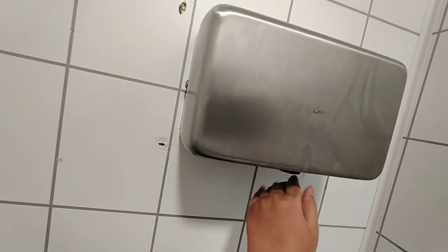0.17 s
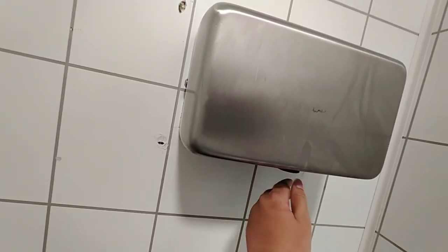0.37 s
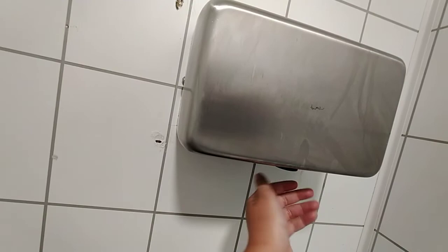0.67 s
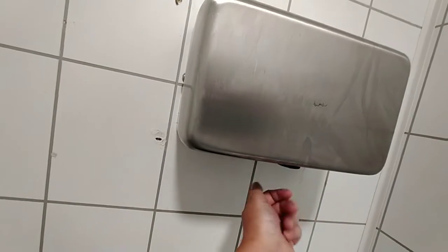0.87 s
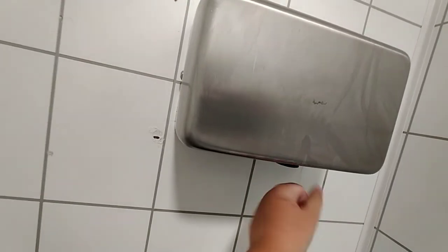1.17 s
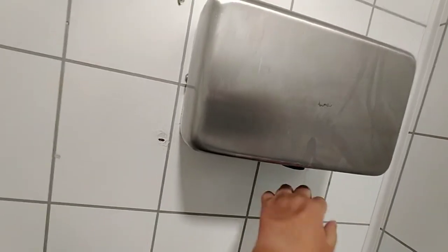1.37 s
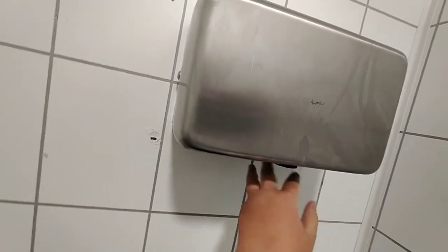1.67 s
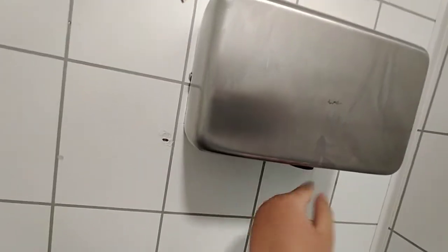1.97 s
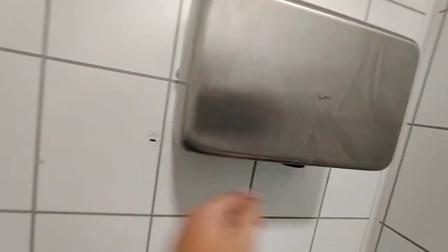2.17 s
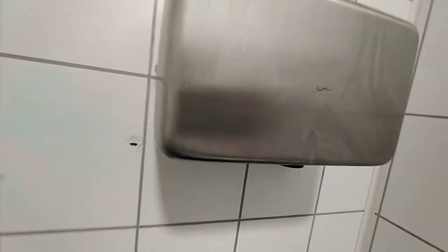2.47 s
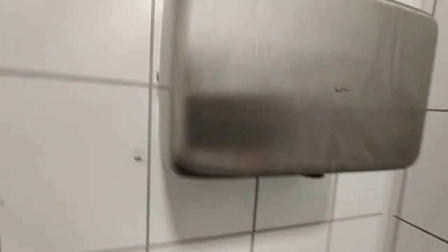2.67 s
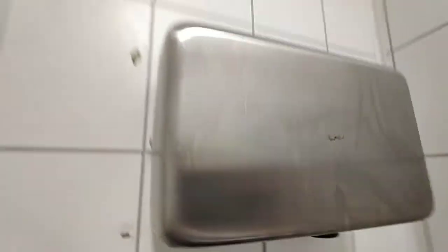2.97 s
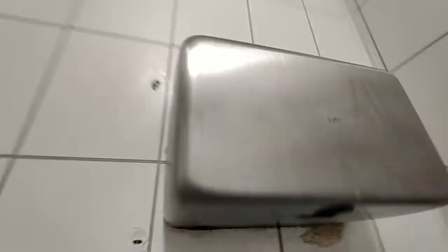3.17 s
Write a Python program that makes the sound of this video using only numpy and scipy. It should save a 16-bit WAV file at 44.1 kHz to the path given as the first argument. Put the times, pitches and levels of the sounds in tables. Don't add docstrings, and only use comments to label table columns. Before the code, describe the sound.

An electric hand dryer roars close to the microphone in a tiled restroom, a narrow, breathy howl with little bass. From 0 to 2.2 seconds a moving hand bends its pitch and adds hiss and rough flutter, busiest around 0.7 to 1.3. At about 2.25 power drops: the blast fades, low hum opens up, and a metallic, resonant motor whine glides down, swelling unevenly until the cut near 3.3.

```python
import sys
import numpy as np
from scipy import signal
from scipy.fft import rfft, irfft
from scipy.io import wavfile
from scipy.ndimage import uniform_filter1d

SR = 44100
rng = np.random.default_rng(int(sys.argv[2]) if len(sys.argv) > 2 else 0)


def voltage_ratio(level):
    return 10 ** (np.asarray(level, float) / 20)


def dump_mix(stems):
    frames = np.atleast_2d(stems).T
    limited = np.clip(frames, -1, 1)
    pcm = np.round(limited * 32767).astype(np.int16)
    wavfile.write(sys.argv[1], SR, pcm)


N = 146412
HZ = np.fft.rfftfreq(1024, 1 / SR)[:, None]
FRAME_S = np.arange(N // 256 + 5) * 256 / SR
TREBLE = np.clip((HZ - 2600) / 900, 0, 1)

# (time [s], howl level [dB], howl pitch [Hz], spray off the skin [dB], rumble of the turned stream [dB])
HAND = [(0, -8.5, 2470, -27.5, -31.5), (.57, -10, 2444, -29, -32), (.72, -10.5, 2550, -26.5, -28),
        (.86, -15.5, 2480, -26.5, -25.5), (.95, -12.5, 2700, -28, -33.5), (1.05, -12.5, 2760, -26.5, -26.5),
        (1.065, -9, 2580, -34, -35.5), (1.145, -11, 2520, -35.5, -30.5), (1.16, -6.5, 2590, -27.5, -31.5),
        (1.28, -10.5, 2560, -31, -29), (1.56, -16.5, 2350, -27.5, -25.5), (1.72, -9.5, 2360, -32.5, -30),
        (1.88, -9.5, 2560, -23.5, -31), (2.09, -8, 2405, -30.5, -34.5), (2.13, -8.5, 2570, -25.5, -24.5),
        (2.225, -12.5, 2240, -32.5, -31.5), (2.27, -12, 2570, -23.5, -27.5),
        (2.4, -14.5, 2490, -25.5, -26.5)]
# (frequency [Hz], width [Hz], level [dB])
NOZZLE = [(2570, 180, 0)]
# (frequency [Hz], level [dB])
HOWL_SKIRT = [(900, -37.5), (1600, -12), (2500, -7.5), (3100, -2.5), (3700, -11.5), (4500, -18)]
# (frequency [Hz], level [dB])
SCATTER = [(1100, -21), (1750, -5), (2000, -0.5), (2250, -2.5), (2600, 1.5), (3100, -6.5), (3600, -16),
           (4400, -34)]
# (frequency [Hz], density [dB per Hz])
SPRAY = [(3300, -7), (4350, -13.5), (4960, -11), (6080, -11), (7460, -9), (8510, -22), (10000, -18),
         (15700, -14.5)]
# (frequency [Hz], width [Hz], lift [dB])
DUCT = [(4970, 275, 9), (7740, 230, 2.5), (9630, 1600, 3.5), (13600, 770, 2.5)]
# (frequency [Hz], density [dB per Hz])
RUMBLE = [(45, -65), (150, -41), (400, -32), (620, -25.5), (720, -18), (1300, -13.5), (2200, -7.5),
          (2800, -14)]
COAST_DB = {"howl": 11.5, "shoulder": 10.5, "spray": 8, "rumble": 9.5, "hum": 0}
# (time [s], speed [turns per s])
ROTOR = [(2.25, 450.5), (2.33, 423), (2.47, 381), (2.6, 346), (2.7, 318), (2.87, 289), (2.99, 258),
         (3.1, 236), (3.32, 202)]
MULTIPLES = [1, 2, 3, 4, 4.35, 7, 12, 24]
# (level [dB], fading [dB], tilt as the rotor halves [dB])
ORDERS = [
    (-33.5, .8, 1),
    (-41, 2.5, 4),
    (-44, 2.5, 5),
    (-41.5, 2, 3),
    (-61, 1.5, 24),
    (-46, 1.5, 10),
    (-41, 1, 7),
    (-60, 3, 0),
]
# (frequency [Hz], width [Hz], level [dB])
TONE_PATH = [(455, 45, -4), (522, 35, 4), (580, 50, 1), (715, 70, 3), (860, 70, 3), (925, 60, 2),
             (1040, 60, 5), (1480, 150, 4), (2750, 900, 4)]
# (frequency [Hz], width [Hz], level [dB])
CASING = [(710, 40, -11), (1440, 24, 2), (1770, 36, -1), (865, 40, -12), (1040, 40, -12), (2120, 30, -10)]
# (time [s], level [dB], length [s])
PUFFS = [
    (1.215, -33, .03),
    (2.09, -41, .02),
]
# (frequency [Hz], width [Hz], level [dB])
ROOM_MODES = [(87, 10, 11), (135, 20, 3), (170, 18, -1), (205, 30, 5), (237, 28, 8), (261, 14, 8),
              (285, 32, 11), (318, 28, 10), (353, 22, 4), (379, 14, 4), (403, 14, 1), (438, 36, 1.5),
              (490, 25, -9)]
# (frequency [Hz], density [dB per Hz])
HUM = [(20, -6), (60, -6), (90, 4), (180, 0.5), (300, -16), (500, -8), (900, -20)]

RUN_HZ, WOBBLE_HZ = 449.8, 0.63
SCATTER_DB, SCATTER_SHARE = -21, .95
CASING_DB, CASING_PEAK_OCT, CASING_FALL_DB = -22.5, .38, 20
HUM_DB = -35
OPEN_S, OPEN_RAMP_S = 2.245, .012
BASS_CUT_DB, TONE_CUT_DB, CASING_CUT_DB = -28, -7, -14
ROOM_T60_S, ROOM_DB = 0.34, -6.5
EDGE_HZ = 15740


def evened(x):
    return x / np.sqrt(np.mean(np.abs(x) ** 2) + 1e-20)


def read(points, hz):
    f, value = np.transpose(points)
    return np.interp(np.log(hz + 1), np.log(f + 1), value)


def modal(modes, hz):
    return sum(voltage_ratio(db) / (1 + 2j * (hz - f) / w) for f, w, db in modes)


def standing(modes, hz):
    return sum((-1) ** k * voltage_ratio(db) / (1 + (2 * (hz - f) / w) ** 2) for k, (f, w, db) in enumerate(modes))


def drift(t, top_hz):
    rates = np.geomspace(1, top_hz, 30)
    return evened(sum(np.sin(2 * np.pi * (f * t + rng.random())) / f ** 0.083 for f in rates))


def speed(t):
    s, hz = np.transpose(ROTOR)
    coasting = np.minimum(np.interp(t, s, hz), RUN_HZ)
    return np.where(t > s[0], coasting, RUN_HZ)


def slowed(t):
    return np.log2(RUN_HZ / speed(t))


def shut(t):
    return 1 - np.clip((t - OPEN_S) / OPEN_RAMP_S, 0, 1)


def hand(column):
    table = np.transpose(HAND)
    return np.interp(FRAME_S, table[0], table[column])


def air(shape, level_db, patchy_db, flicker_db):
    a, b, patches = rng.standard_normal((len(FRAME_S), 513, 3)).T
    patches = uniform_filter1d(patches, size=12, axis=0)
    patches = evened(uniform_filter1d(patches, size=10, axis=1))
    shape = shape / np.sqrt(np.sum(shape ** 2, axis=0))
    gain = voltage_ratio(level_db + patchy_db * patches + flicker_db * drift(FRAME_S, top_hz=30.35))
    spectra = (a + 1j * b) * shape * gain
    return signal.istft(spectra, nperseg=1024, noverlap=768)[1][:N] * np.sqrt(1.5)


def ring(modes, colour, level_db, flicker_db):
    t, hz = np.arange(N) / SR, np.fft.rfftfreq(N, 1 / SR)
    rung = irfft(rfft(rng.standard_normal(N)) * modal(modes, hz) * voltage_ratio(read(colour, hz)), N)
    return evened(rung) * voltage_ratio(np.interp(t, FRAME_S, level_db) + flicker_db * drift(t, top_hz=20))


def howl():
    moved = HZ * NOZZLE[0][0] / hand(2)
    shape = abs(modal(NOZZLE, moved)) * voltage_ratio(read(HOWL_SKIRT, moved))
    level_db = hand(1) - 4.0 - COAST_DB["howl"] * slowed(FRAME_S)
    return air(shape, level_db, 0.57, 0.7)


def scattered_howl():
    nudged = HZ * (NOZZLE[0][0] / hand(2)) ** 0.25
    turned_db = SCATTER_SHARE * (hand(4) - np.mean(np.transpose(HAND)[4]))
    level_db = SCATTER_DB + turned_db - COAST_DB["shoulder"] * slowed(FRAME_S)
    return air(voltage_ratio(read(SCATTER, nudged)), level_db, 2.8, 1.0)


def spray():
    lift_db = sum(db * np.exp(-((HZ - f) / w) ** 2) for f, w, db in DUCT)
    level_db = hand(3) - COAST_DB["spray"] * slowed(FRAME_S)
    return air(TREBLE * voltage_ratio(read(SPRAY, HZ) + lift_db), level_db, 1.0, 1.2)


def rumble():
    shape = (HZ > 0) * voltage_ratio(read(RUMBLE, HZ) - 30 * TREBLE)
    level_db = hand(4) + 8.5 - COAST_DB["rumble"] * slowed(FRAME_S)
    return air(shape, level_db, 1.72, 0.54)


def rotor():
    t = np.arange(N) / SR
    hz = uniform_filter1d(speed(t), size=1500) + WOBBLE_HZ * drift(t, top_hz=12)
    turn = 2 * np.pi * np.cumsum(hz) / SR
    tones = []
    for k, (db, fading_db, tilt_db) in zip(MULTIPLES, ORDERS):
        fade_db = fading_db * drift(t, top_hz=14)
        level = voltage_ratio(db + fade_db + tilt_db * slowed(t) + TONE_CUT_DB * shut(t))
        if tones:
            path = standing(TONE_PATH, k * hz) / (1 + (k * hz / 3300) ** 12)
        else:
            path = standing(ROOM_MODES, hz)
        tones.append(np.sqrt(2) * level * (path * np.exp(1j * k * turn)).real)
    return sum(tones)


def casing():
    off_peak = slowed(FRAME_S) - CASING_PEAK_OCT
    level_db = CASING_DB - CASING_FALL_DB * off_peak ** 2 + CASING_CUT_DB * shut(FRAME_S)
    return ring(CASING, [(400, 1), (700, -0.5), (2200, -2.5), (3000, -33)], level_db, 0.66)


def puffs():
    t = np.arange(N) / SR
    return sum(voltage_ratio(db) * np.exp(-((t - s) / length) ** 2) * np.sin(4 * (t - s) / length)
               for s, db, length in PUFFS)


def room_hum():
    level_db = HUM_DB - COAST_DB["hum"] * slowed(FRAME_S) + BASS_CUT_DB * shut(FRAME_S)
    return ring(ROOM_MODES, HUM, level_db, 0.83)


def tiles(x):
    at = np.arange(200, 16000, 22)
    taps = np.zeros(16100)
    signs = rng.choice([-1., 1.], len(at))
    taps[at + rng.integers(0, 22, len(at))] = signs * voltage_ratio(-60 * at / SR / ROOM_T60_S)
    taps *= voltage_ratio(ROOM_DB) / np.linalg.norm(taps)
    taps[0] = 1
    lead = np.concatenate([x[:8000][::-1], x])
    return signal.fftconvolve(lead, taps / np.linalg.norm(taps))[8000:][:N]


def scene():
    near = howl() + spray()
    far = tiles(scattered_howl() + rumble())
    return (near + far + rotor() + casing() + puffs() + room_hum())[None]


def band_limit(x):
    return signal.sosfilt(signal.butter(12, 17040, fs=SR, output="sos"), x)


def record(dry):
    limited = 0.51 * np.tanh(dry / 0.74)
    lowpass = signal.firwin(1023, EDGE_HZ, window=("kaiser", 9), fs=SR)
    band = signal.oaconvolve(limited, lowpass[None], "same")
    return band_limit(band)


dry = scene()
out = record(dry)
dump_mix(out)
```